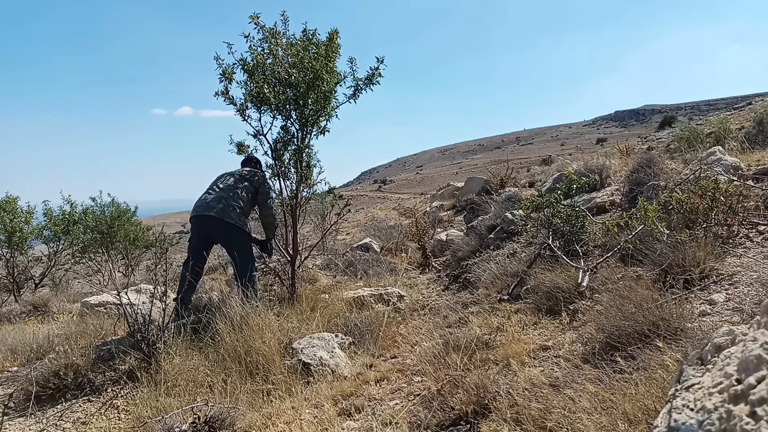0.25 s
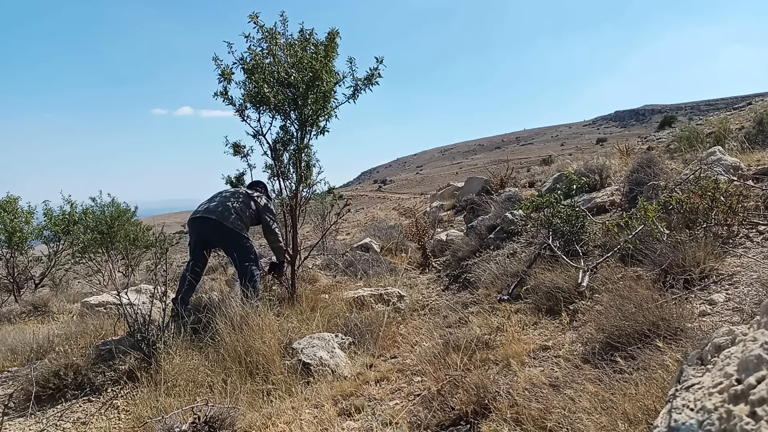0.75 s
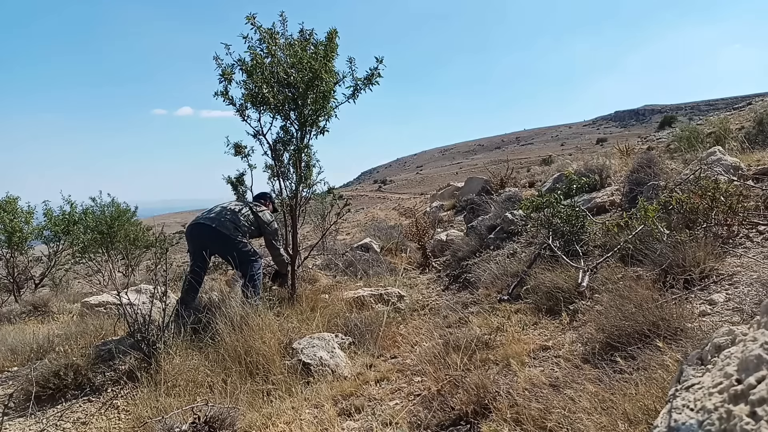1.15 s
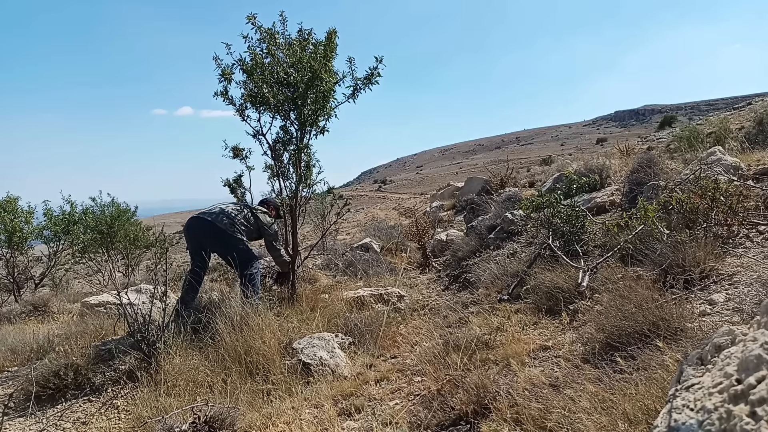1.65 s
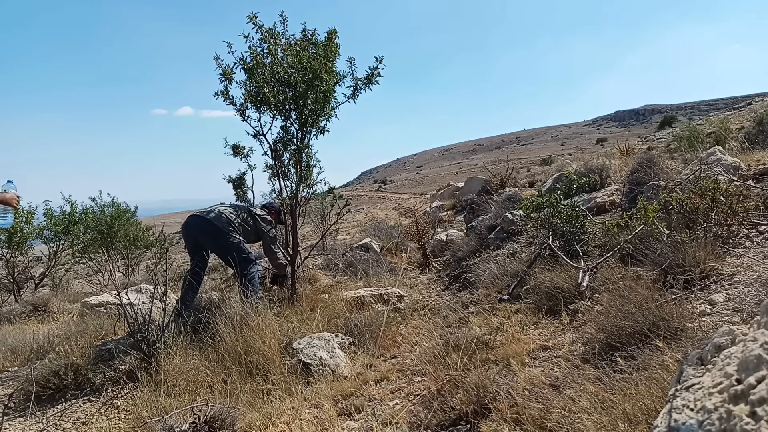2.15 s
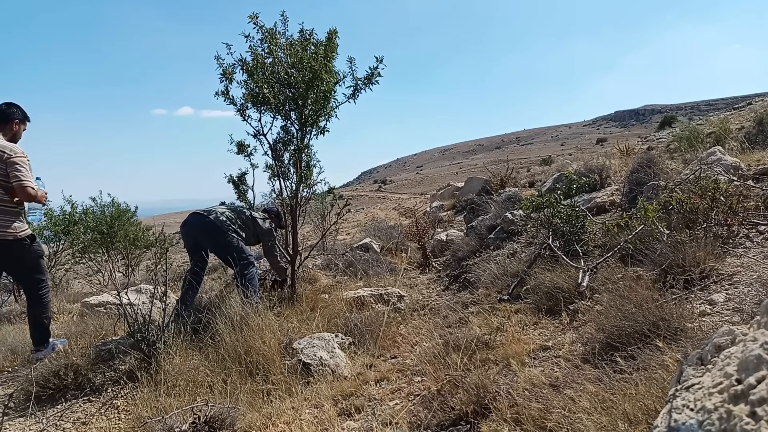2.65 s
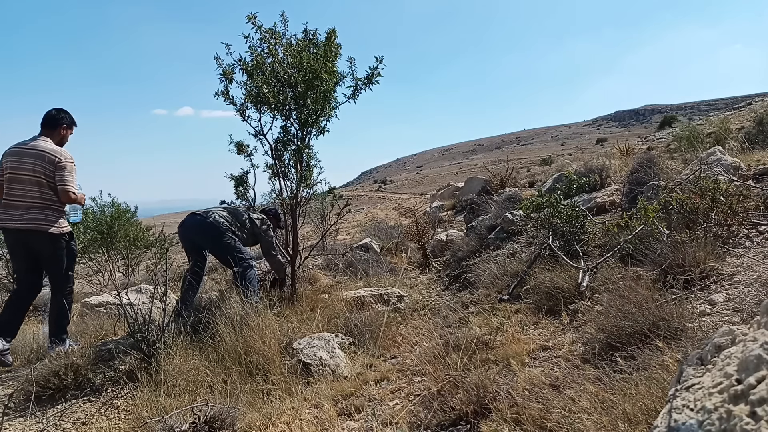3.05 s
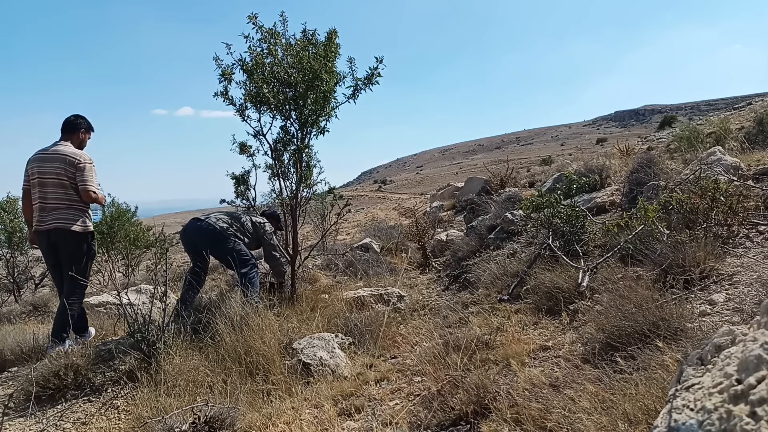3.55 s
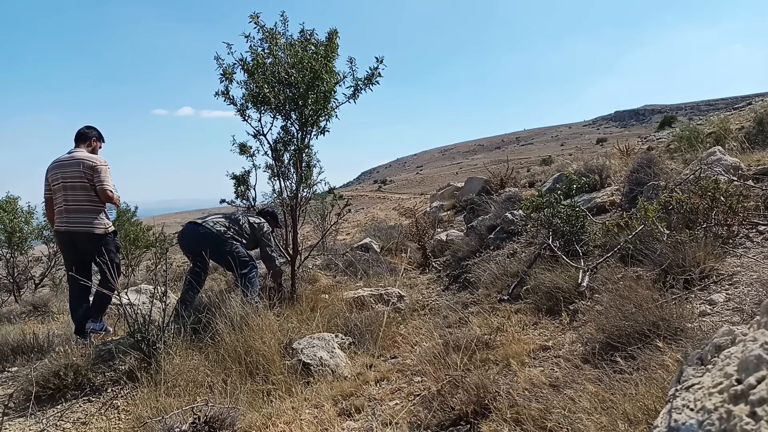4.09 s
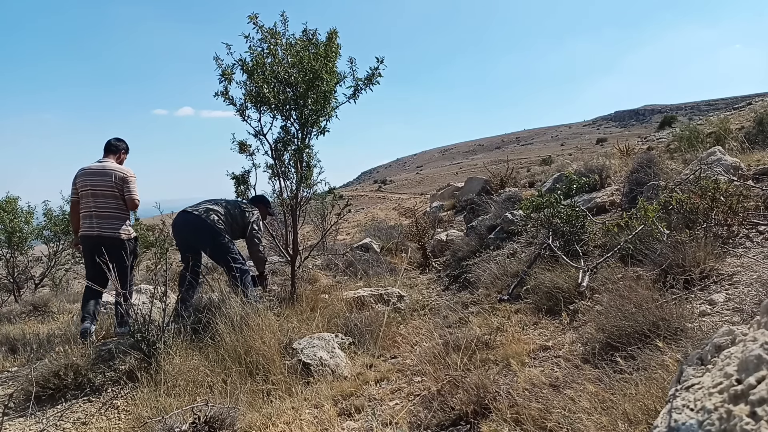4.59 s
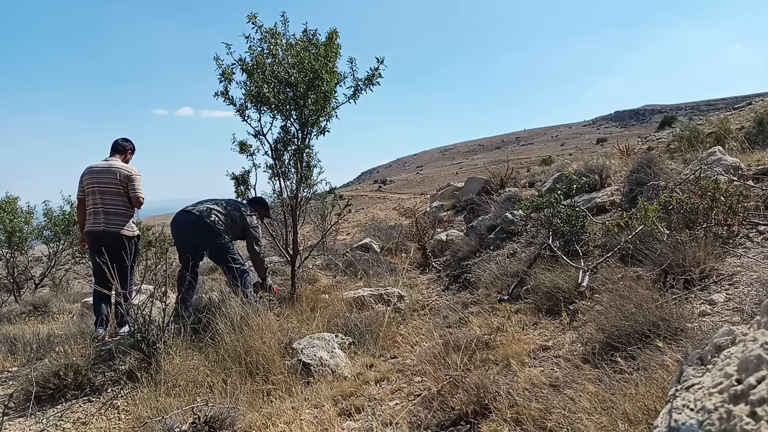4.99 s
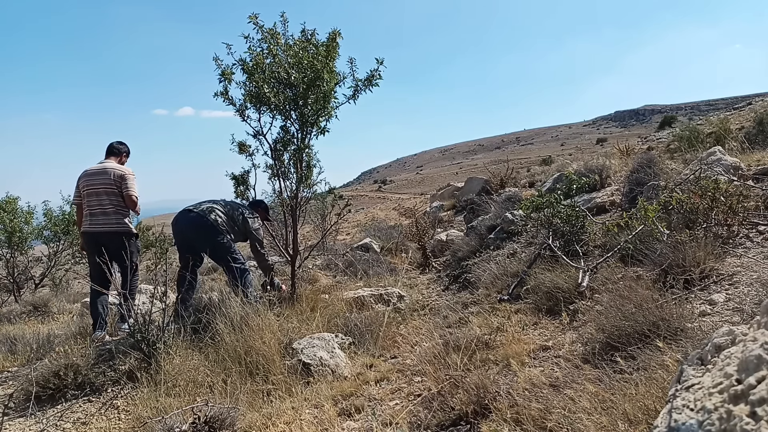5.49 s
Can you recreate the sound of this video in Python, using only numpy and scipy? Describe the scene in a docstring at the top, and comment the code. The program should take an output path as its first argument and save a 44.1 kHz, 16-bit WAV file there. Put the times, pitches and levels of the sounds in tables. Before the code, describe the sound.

On an open hillside, stems are snipped and torn with short squeaking scrapes among crackling dry leaves and rumbling wind buffets.

```python
"""Dry hillside, outdoors: brush is cut back near the microphone, over a faint hush of open air.
A hard puff bumps the microphone, dry branches rustle and twigs snap; at 1.8 s a blade begins to scrape and squeak.
After 3 s there is a lull of light rustling, then from 3.7 s stronger gusts, with two more strokes near 4 s.
The loudest stroke comes at 5.4 s and a faint touch of the blade at 5.7 s. Shaped noise makes the air, gusts, leaves,
tearing and snaps; decaying sines make the puffs, and narrow gliding noise bands make the squeaks."""
import sys
import numpy as np
from scipy import signal
from scipy.fft import rfft, irfft, next_fast_len
from scipy.io import wavfile
from scipy.ndimage import uniform_filter1d, map_coordinates

SR = 44100
rng = np.random.default_rng(int(sys.argv[2]) if len(sys.argv) > 2 else 0)


def generate_wav(signal):
    """Clip the signal to [-1, 1] and save it as 16-bit WAV at the path in sys.argv[1]."""
    frames = np.transpose(np.atleast_2d(signal))
    scaled = np.clip(frames, -1, 1) * 32767
    pcm = np.round(scaled).astype(np.int16)
    wavfile.write(sys.argv[1], SR, pcm)


N = 252693
TIME = np.arange(N) / SR

# open air, spectrum: (frequency [Hz], relative level [dB])
AIR_SPECTRUM = [(15, -42), (25, -8.5), (59, -6.5), (89, -10), (212, -12.5), (463, -19), (3430, -31),
                (4250, -29.5), (6050, -42.5), (9570, -42.5), (16000, -49)]
AIR_DB, AIR_WAVER_DB = -62.5, 1  # typical level, slow waver

# wind rumble at the microphone, spectrum: (frequency [Hz], relative level [dB])
RUMBLE_SPECTRUM = [(13, -55), (22, -13.5), (70, 7), (96, 4), (153, -8.5), (180, -14), (265, -22),
                   (302, -31), (335, -36), (453, -48.5), (700, -67.5), (910, -81), (1540, -120)]
# light air between gusts: (time [s], rumble level before BREEZE_TRIM_DB [dB])
BREEZE = [(0.0, -32), (0.8, -53), (1.21, -52), (1.71, -46.5), (3.05, -57.5), (3.4, -54.5), (3.94, -42),
          (4.2, -61), (4.61, -33), (4.98, -60), (5.22, -39), (5.73, -64.5)]
BREEZE_TRIM_DB = -2.5
# gusts on the microphone: (time [s], length [s], rumble level [dB],
# flutter level against the rumble, before its trim [dB])
GUSTS = [(0.0, 0.045, -23.5, -22), (0.052, 0.26, -35, -32), (0.438, 0.02, -29.5, -38),
         (0.522, 0.037, -38, -34), (0.894, 0.033, -28.5, -14), (0.95, 0.06, -36, -22),
         (1.067, 0.048, -42, -12.5), (1.323, 0.069, -31.5, -30), (1.459, 0.18, -33, -22),
         (1.733, 0.12, -35, -31), (1.884, 0.03, -27, -11), (1.947, 0.06, -31, -43), (2.03, 0.057, -42, -24),
         (2.193, 0.075, -27, -28.5), (2.287, 0.09, -45.5, -25), (2.497, 0.049, -37.5, -30),
         (2.589, 0.026, -27, -29), (2.784, 0.066, -46, 1.5), (2.863, 0.03, -31, -20),
         (3.071, 0.021, -46.5, -23), (3.368, 0.13, -41.5, -26), (3.602, 0.014, -36, -18),
         (3.743, 0.069, -24.5, -20.5), (3.819, 0.077, -21, -13), (3.903, 0.084, -31.5, -20.5),
         (4.026, 0.046, -26.5, -21), (4.145, 0.015, -35, -41), (4.238, 0.027, -35, -35),
         (4.389, 0.13, -19, -16), (4.503, 0.083, -21, -7), (4.605, 0.059, -25, -16.5),
         (4.704, 0.06, -31.5, -23), (4.788, 0.023, -24, -32), (4.884, 0.054, -36, -26),
         (5.075, 0.04, -31, -13), (5.136, 0.132, -34.5, -35), (5.335, 0.03, -31, -32.5),
         (5.39, 0.035, -41, -30), (5.515, 0.079, -44, -27)]
GUST_RISE_DB_PER_S, GUST_FALL_DB_PER_S = 756, 623
# single hard puffs: (time [s], relative level [dB], nominal pitch [Hz])
PUFFS = [(0.036, -10, 123), (0.422, -25, 95), (0.875, -24.5, 200), (0.949, -21, 119), (1.487, -23.5, 112),
         (1.593, -16, 114), (2.232, -22, 112), (2.584, -18, 115), (2.607, -20, 102), (3.716, -18.5, 128),
         (4.518, -13, 111.7), (4.567, -11, 185), (4.634, -16, 140), (4.792, -18, 106), (5.127, -19, 113),
         (5.284, -20, 100)]

# soft scuffs in the dry grass: (time [s], length [s], level [dB])
SCUFFS = [(1.051, 0.078, -56.5), (1.162, 0.072, -52), (2.762, 0.16, -55.5), (3.607, 0.15, -70),
          (4.095, 0.127, -54)]

# dry leaves, spectrum: (frequency [Hz], relative level [dB])
LEAVES_SPECTRUM = [(240, -51), (400, -18), (687, -12), (979, -14), (1130, -17), (1820, -10), (2290, -15.5),
                   (3210, -6), (4110, -7.5), (6340, 0.5), (7990, -2), (11400, -11.5), (16000, -20)]
# ringing of dry twigs: (frequency [Hz], width [Hz], relative level [dB])
TWIG_MODES = [(2880, 69, -13), (5300, 160, -6), (6450, 100, -14.5), (7900, 67, -14), (8200, 96, -18),
              (9100, 700, -5.5)]
# pushes on dry branches and grass: (time [s], length [s], level [dB], swell over the push [dB],
# settling rate [dB/s])
PUSHES = [(0.049, .07, -57.5, -5, 200), (0.141, 0.086, -29.5, 8, 153), (0.41, 0.061, -56.5, -8.5, 80),
          (0.852, 0.025, -45, -7, 107), (1.041, 0.12, -46.5, -1.5, 235), (1.258, 0.16, -64.5, -7, 54),
          (2.324, 0.08, -50.5, 8, 400), (2.71, 0.16, -55, -5, 200), (3.1, .2, -67, -1, 60),
          (3.445, 0.427, -56.5, 8.5, 300), (4.17, .13, -50, -14, 200), (4.429, 0.11, -43.5, 3, 157),
          (4.845, .19, -60, -5.5, 100), (5.045, 0.13, -47, -1, 150)]
PUSH_RISE_DB_PER_S = 603
STIR_DB = -71  # the leaves never quite come to rest

# breaking stems, spectrum: (frequency [Hz], relative level [dB])
TWIG_SPECTRUM = [(410, -87), (700, -38), (1150, -19), (1560, -9.5), (2880, -9), (3410, -9), (3940, -7.5),
                 (4550, -7), (5190, -4), (5610, -3.5), (7010, -3.5), (7590, -4), (9480, -3), (16000, -27.5)]
# snips and breaking twigs: (time [s], relative level [dB], pitch [Hz], relative woody knock [dB],
# relative bright edge [dB])
SNAPS = [(0.0431, -29.5, 6950, -32, -38), (0.0895, -30, 6900, -36, -32), (0.162, -13, 8210, -8, -3),
         (0.179, -15.5, 7640, -12, 3), (0.2205, -14, 6150, -38, -12.5), (0.2745, -17, 9100, -34, -33),
         (0.3603, -26, 6500, -39, -16), (0.398, -36, 6640, -41, -19), (0.7014, -35, 6200, -34, -16),
         (0.8062, -33.5, 9200, -31, -9), (0.9306, -29, 6900, -38, -12), (1.0326, -10.5, 6700, -11.5, -6),
         (1.383, -40, 5970, -32, -18), (1.6223, -41, 1130, 1, -32), (1.6819, -24.5, 3530, -7.5, -32),
         (1.824, -20.5, 2550, -12, -37), (1.8546, -23.5, 6700, -9, -34), (1.9345, -16, 4440, -1, -12),
         (1.9438, -18.5, 6160, -32, -9), (2.335, -16.5, 7400, -37, -9), (2.373, -17.5, 10400, -32, -20),
         (2.4783, -20.5, 9300, -35, -11), (2.5312, -19.5, 7600, -17, -21), (2.6399, -11.5, 7140, -11, -15),
         (2.6639, -11, 7250, -16, -10), (2.8494, -17, 6300, -35, -18), (2.979, -24.5, 6840, -31, -37),
         (3.123, -38.5, 2330, 3, -35), (3.436, -38.5, 7000, -16, -31), (3.672, -35, 1490, 0, -32),
         (3.6897, -15, 4920, -35, -14), (3.7807, -32, 5200, -18, -20), (3.7934, -29.5, 9100, -15, -17),
         (3.843, -16, 5540, -38, -18), (3.8625, -28, 6050, -11, -18), (4.0898, -15.5, 3520, -16, -34),
         (4.126, -17.5, 5230, -17, -20), (4.1627, -16, 3440, -19, -14), (4.2357, -29, 6850, -33, -12),
         (4.4295, -16, 7600, -15.5, -16), (4.8436, -25, 6000, -27, -19), (4.948, -42, 5920, -25, -2),
         (5.0543, -26, 6640, -20, -32), (5.0819, -18, 8000, -26, -19), (5.0922, -23.5, 6640, -17, -26.5),
         (5.1472, -24, 9000, -38, -11), (5.164, -25.5, 9150, -17, -38), (5.227, -35, 3880, -9, -38),
         (5.402, -22, 7050, -9.5, -15), (5.6136, -43, 10710, -32, -8)]

# blade tearing through stems, spectrum: (frequency [Hz], relative level [dB])
SCRAPE_SPECTRUM = [(240, -60), (400, -20.5), (607, -23.5), (789, -18), (964, -19), (1350, -6.5),
                   (1790, -14.5), (2180, -4), (2550, -4.5), (3420, -1.5), (5110, -2.5), (6850, 3.5),
                   (10500, -13), (11200, -19), (16000, -35)]
# ringing of the steel blade: (frequency [Hz], relative level [dB])
BLADE_MODES = [(2998, -62), (3499, -68.5), (3898, -58), (4258, -63), (4705, -53), (5152, -63), (5469, -60),
               (7058, -63), (8091, -56), (9216, -63)]
# rough side tones of the squeak: (multiple of the pitch [ratio], width [Hz], relative level [dB])
SIDE_TONES = [(.63, 500, -7), (.82, 550, -13), (1.12, 450, -12), (1.54, 448, -10.5), (1.68, 542, -23.5),
              (1.96, 777, -9.5)]
# blade strokes: (time [s], length [s], time to the deepest bite [s], relative level there [dB],
# swell before it [dB], sag after it [dB], woody body [dB], hiss at full speed [dB],
# bright edge at full speed and depth [dB], run-up [s], squeak at full speed [Hz],
# clearest squeak after the start [s], main tone at its clearest [dB], upper tone at its flare [dB])
STROKES = [(1.768, .21, 0.15, -43.5, 13.5, 2, -13, 2.5, -9, .02, 4270, 0.14, -7, -11),
           (2.049, 0.16, 0.042, -47.5, 3.5, -1.5, -19.5, 3.5, -13.5, .03, 4260, 0.087, -1, -1.5),
           (2.481, 0.27, 0.18, -41.5, 13.5, 0.5, -13.5, 4, -6.5, .14, 5450, 0.2, -14, -8.5),
           (2.793, .19, 0.084, -45, 7, -0.5, -19.5, 3, -9.5, .03, 4300, 0.13, -5, -14),
           (3.999, 0.24, 0.1, -33.5, 13, 12, -16.5, -1.5, -12.5, .085, 5480, 0.014, 0, -12),
           (4.29, 0.19, 0.17, -42.5, 6, 4, -31, 3.5, -7, .05, 4300, 0.11, -1, -9),
           (5.355, .167, 0.14, -30.5, 22.5, 3.5, -26, -4.5, -10.5, .085, 5250, 0.17, -7, -1),
           (5.674, 0.038, 0.011, -49.5, 5, 5, -42, -19, -24, .01, 3580, 0.017, -10, -25)]
STROKE_RISE_DB_PER_S, STROKE_STOP_DB_PER_S = 1300, 1111
BLADE_RING_DB, BLADE_RING_DB_PER_S = -19.5, 230  # lingering ring: level against the stroke, decay
START_SPEED, END_SPEED = .42, 0.57  # shares of full speed
BRAKE_S, BRAKE_FROM_HZ = .055, 4800  # slowing time; only strokes squeaking above this are braked
HISS_DB_PER_SPEED, EDGE_DB_PER_SPEED = 12, 25  # brightening per unit share of full speed
EDGE_OPENS_DB = 15  # a deeper bite is brighter
SQUEAK_S, SQUEAK_FADE_DB = 0.055, 15.5  # how long the squeak stays clear, how far it then sinks
# the upper squeak flares just after full speed: delay, duration, and how far it then sinks
UPPER_AFTER_S, UPPER_S, UPPER_FADE_DB = 0.0045, 0.055, 11.5
SIDE_TONES_DB = -1

TOP_HZ = 16100  # band limit of the recorder


def amp(db):
    """Decibels to gain."""
    return 10 ** (np.asarray(db) / 20)


def unit(x):
    """Scale to rms 1."""
    return x / np.sqrt(np.mean(x ** 2) + 1e-20)


def gain(points, hz):
    """Gain of (Hz, dB) points on a log frequency axis."""
    f, db = np.transpose(points)
    return amp(np.interp(np.log(hz + 1), np.log(f + 1), db))


def wobble(rate):
    """A smooth random curve, rate knots a second."""
    knots = rng.standard_normal(int(N * rate / SR) + 4)
    return map_coordinates(knots, [np.arange(N) * rate / SR])


def filtered(x, response):
    """x times a response of frequency."""
    m = next_fast_len(len(x) + 4096)
    return irfft(rfft(x, m) * response(np.fft.rfftfreq(m, 1 / SR)), m)[:len(x)]


def coloured(x, spectrum):
    """x with a spectrum, at rms 1."""
    return unit(filtered(x, lambda hz: gain(spectrum, hz)))


def add(track, s, x):
    """Mix x into the track at time s."""
    i = int(np.clip(round(s * SR), 0, N))
    track[i:i + len(x)] += x[:N - i]


def steady(x):
    """Even out the slow swells of x and keep its fine grain."""
    return x / np.sqrt(np.abs(uniform_filter1d(x ** 2, size=1300)) + 1e-9)


def plateau(s, length, rise_db_per_s, fall_db_per_s):
    """Envelope that rises to 1 at s, holds for length and dies away."""
    before = np.minimum(TIME - s, 0)
    after = np.maximum(TIME - s - length, 0)
    return amp(rise_db_per_s * before - fall_db_per_s * after)


def crackle(rate, spread_db, decay_s, hiss, count=16000):
    """Tiny fibre breaks of uneven size, each a short burst, over smooth friction hiss."""
    wait, size = rng.exponential(size=(2, count))
    start = (np.cumsum(wait) / rate * SR).astype(int)
    breaks = np.bincount(start, amp(spread_db * np.minimum(size, 4)) ** 2, N)[:N]
    energy = signal.lfilter([1], [1, -amp(-120 / (decay_s * SR))], breaks)  # falls 60 dB in decay_s
    return unit(np.sqrt(energy / energy.mean() + hiss ** 2) * rng.standard_normal(N))


def patchy(x, depth_db, size=256):
    """Each leaf and fibre has its own pitch: short, narrow patches of random gain."""
    z = signal.stft(x, nperseg=size)[2]
    field = uniform_filter1d(rng.standard_normal(z.shape), size=3, axis=0)
    field = uniform_filter1d(field, size=5, axis=1)
    patches = amp(depth_db * np.clip(unit(field), -2, 2))
    return unit(signal.istft(z * patches, nperseg=size)[1][:N])


def air():
    """The nearly steady hush of the open hillside, as shaped noise."""
    return amp(AIR_DB + AIR_WAVER_DB * wobble(2.91)) * coloured(rng.standard_normal(N), AIR_SPECTRUM)


def hillside(x, ground=0.17, wet_db=-21, t60=0.15):
    """The ground returns a close copy that ripples the spectrum; rocks and bushes scatter a short tail."""
    lag = .000854  # seconds
    echo = lambda hz: 1 + ground * np.exp(-2j * np.pi * hz * lag)
    x = filtered(x, echo) / np.hypot(1, ground)
    t = np.arange(SR // 2) / SR
    tail = filtered(rng.standard_normal(len(t)), lambda hz: 1 / (1 + (hz / 7000) ** 2))
    tail = tail * amp(-60 * t / t60) * (t > .004)
    return x + amp(wet_db) * signal.fftconvolve(x, tail / np.linalg.norm(tail))[:N]


def wind(dip=0.18, lumpy_db=3.0, flutter_trim_db=-2):
    """Eddies buffet the microphone with a deep rumble and a quicker flutter; a hard puff sweeps them aside."""
    deep = amp(np.interp(TIME, *np.transpose(BREEZE)) + BREEZE_TRIM_DB)
    quick = np.zeros(N)
    for s, length, db, flutter_db in GUSTS:
        gust = amp(db) * plateau(s, length, GUST_RISE_DB_PER_S, GUST_FALL_DB_PER_S)
        deep = np.maximum(deep, gust)
        quick = np.maximum(quick, gust * amp(flutter_db + flutter_trim_db))
    eddies = coloured(rng.standard_normal(N), RUMBLE_SPECTRUM)
    rumble = filtered(eddies, lambda hz: 1 / (1 + (hz / 200) ** 10))
    flutter = eddies - rumble
    swept = np.max([np.exp(-((TIME - s - .01) / 0.049) ** 2) for s, _, _ in PUFFS], axis=0)
    lumps = unit(amp(lumpy_db * np.clip(wobble(32), -2, 1.2)))
    return lumps * (1 - dip * swept) * (deep * steady(rumble) + quick * steady(flutter))


def bumps(sharpness=2.5):
    """A hard puff swings the diaphragm back and forth once or twice; the harder it is, the sharper it knocks."""
    out = np.zeros(N)
    t = np.arange(SR // 16) / SR - .009
    onset = np.clip((t - t[0]) / 0.0054, 0, 1)
    for s, db, hz in PUFFS:
        swing = np.sin(2 * np.pi * hz * 1.007 * t) * np.exp(-np.abs(t) * hz * 3.0) * onset
        reach_hz = sharpness * hz * amp(.5 * (db + 18.5))
        knock = filtered(swing, lambda f: 1 / (1 + (f / reach_hz) ** 6))
        add(out, s, -amp(db + 5.5) * knock)
    return out


def scuffs():
    """Dull, short shuffles on the ground, as swells of low noise."""
    out = np.zeros(N)
    earth = coloured(rng.standard_normal(N), [(80, -44), (250, 3), (600, 2), (1200, -7.0), (3000, -14)])
    for s, length, db in SCUFFS:
        out += amp(db) * np.sin(np.pi * np.clip((TIME - s) / length, 0, 1)) * earth
    return out


def twig_ring(hz, ring=1.6):
    """Dry twigs add their resonances to the rustle."""
    return 1 + ring * sum(amp(db) / (1 + 2j * (hz - centre) / width) for centre, width, db in TWIG_MODES)


def rustle(ticks_db=-5):
    """Each push makes dry leaves crackle in clumps, tick and set the twigs ringing; then the branch settles."""
    level = np.full(N, amp(STIR_DB))
    for s, length, db, swell_db, settle_db_per_s in PUSHES:
        swell = amp(db + swell_db * np.clip((TIME - s) / length - 1, -1, 0))
        push = swell * plateau(s, length, PUSH_RISE_DB_PER_S, settle_db_per_s)
        level = np.maximum(level, push)
    grains = crackle(rate=700, spread_db=4, decay_s=0.021, hiss=0.43) * amp(1.9 * wobble(60))
    ticks = crackle(rate=55, spread_db=4.5, decay_s=0.017, hiss=0)
    leaves = patchy(grains + amp(ticks_db) * ticks, depth_db=4.8)
    return level * coloured(filtered(leaves, twig_ring), LEAVES_SPECTRUM)


def snaps(crack_s=0.033, tail_s=0.12, tail_db=-23, lead_in_db=-19, ring_db=7, ring_width_hz=400):
    """A faint rush of noise swells for 12 ms into a sharp crack, which rings briefly at its pitch and shivers out."""
    out, lead = np.zeros(N), .012  # seconds of soft lead-in before the crack
    t = np.arange(SR // 8) / SR - lead
    lead_in = amp(lead_in_db - 60 * np.abs(t) / 0.025)
    release = amp(-60 * t / crack_s) + amp(tail_db - 60 * t / tail_s)
    fade = np.where(t < 0, lead_in, release)
    grain_hz = np.arange(0, SR / 2, 350)
    for s, db, pitch, knock_db, edge_db in SNAPS:
        knock = np.clip(knock_db + 12.5, -12, 12)
        edge = np.clip(edge_db + 17.0, -12, 12)
        tilt = [(1800, knock), (4000, 0), (8500, 0), (12000, edge)]
        # every stem has its own uneven set of resonances
        grain = np.c_[grain_hz, 3 * rng.standard_normal(len(grain_hz))]

        def stem(hz):
            """Colour of this stem, with a peak at its pitch."""
            peak = 1 + amp(ring_db) / (1 + ((hz - pitch) / ring_width_hz) ** 2)
            return gain(TWIG_SPECTRUM, hz) * gain(tilt, hz) * peak * gain(grain, hz)

        crack = filtered(rng.standard_normal(len(t)) * fade, stem)
        add(out, s - lead, amp(db - 25) * unit(crack))
    return out


def blade_speed(t, length, run_up, top_hz):
    """Share of full speed: the blade gathers pace, and the fast strokes are braked before they end."""
    gather = START_SPEED + (1 - START_SPEED) * np.sin(np.pi / 2 * np.clip(t / run_up, 0, 1))
    brake = (1 - END_SPEED) * np.clip((t - length) / BRAKE_S + 1, 0, 1) ** 2
    return gather * (1 - brake * (top_hz > BRAKE_FROM_HZ))


def blade_ring(hz, ring=1.03, width_hz=45):
    """The narrow resonances of the blade colour whatever it tears."""
    centres, db = np.transpose(BLADE_MODES)
    gains = amp(db - db.max())
    return 1 + ring * sum(g / (1 + 2j * (hz - centre) / width_hz) for centre, g in zip(centres, gains))


def squeak(hz, tone_db, upper_db, upper_ratio=1.54, stray=.035, flicker_db=4.5, width_hz=190):
    """Friction tones and side tones glide with the blade's speed and flicker as its grip changes."""

    def line(pitch, width):
        """Narrow noise of rms 1 around a moving pitch."""
        turn = 2 * np.pi * np.cumsum(pitch) / SR
        return unit(wobble(width) * np.cos(turn) + wobble(width) * np.sin(turn))

    def tone(pitch):
        """A clear, slightly unsteady line."""
        wavering = pitch * (1 + 0.0051 * wobble(50))
        return unit(steady(line(wavering, width_hz)) * amp(2.3 * wobble(60)))

    sides = np.zeros(N)
    for ratio, width, db in SIDE_TONES:
        flicker = amp(db + flicker_db * wobble(40))
        sides += flicker * line(ratio * hz * (1 + stray * wobble(35)), width)
    # the side tones fade with the main one, half as fast
    sides_db = SIDE_TONES_DB + .5 * np.minimum(tone_db, 0)
    return amp(tone_db) * tone(hz) + amp(upper_db) * tone(upper_ratio * hz) + amp(sides_db) * sides


def strokes(lead_s=.025):
    """The blade tears fibres and squeaks, louder as it bites deeper and brighter as it runs faster, then rings out."""
    rows = np.array(STROKES)
    # each stroke's settings take over lead_s before it starts
    current = np.maximum(np.searchsorted(rows[:, 0] - lead_s, TIME) - 1, 0)
    (s, length, bite, db, swell_db, sag_db, body_db, hiss_db, edge_db,
     run_up, top_hz, clear_s, tone_db, upper_db) = rows[current].T
    t = TIME - s
    speed = blade_speed(t, length, run_up, top_hz)
    shallow = np.clip(1 - t / bite, 0, 1)
    spent = np.clip((t - bite) / np.maximum(length - bite, .005), 0, 1)
    cut = plateau(s, length, STROKE_RISE_DB_PER_S, STROKE_STOP_DB_PER_S)
    ring = amp(BLADE_RING_DB) * plateau(s, length, STROKE_RISE_DB_PER_S, BLADE_RING_DB_PER_S)
    gate = np.maximum(cut, ring)

    fade_db = SQUEAK_FADE_DB * (np.exp(-((t - clear_s) / SQUEAK_S) ** 2) - 1)
    flare_db = UPPER_FADE_DB * (np.exp(-((t - run_up - UPPER_AFTER_S) / UPPER_S) ** 2) - 1)
    tearing = patchy(crackle(rate=1000, spread_db=3.5, decay_s=0.0039, hiss=0.99), depth_db=4.5)
    drive = tearing + squeak(top_hz * speed, tone_db + fade_db, upper_db + flare_db)
    rasp = coloured(filtered(drive, blade_ring), SCRAPE_SPECTRUM)

    # split into four bands, each levelled before it follows the stroke
    below = [filtered(rasp, lambda hz: 1 / (1 + (hz / edge_hz) ** 20)) for edge_hz in (1850, 5300, 9200)]
    bands = np.diff([np.zeros(N), *below, rasp], axis=0)
    body, core, hiss, edge = (steady(band) for band in bands)
    body = body * amp(body_db)
    hiss = hiss * amp(hiss_db + HISS_DB_PER_SPEED * (speed - 1))
    edge = edge * amp(edge_db + EDGE_DB_PER_SPEED * (speed - 1) - EDGE_OPENS_DB * shallow)
    level = amp(db - swell_db * shallow - sag_db * spent)
    return gate * level * (core + body + hiss + edge)


def scene():
    """The work in the brush, with wind and air at the microphone."""
    work = scuffs() + rustle() + snaps() + strokes()
    return (air() + wind() + bumps() + hillside(work))[None]


def record(dry, low_cut_hz=50):
    """The recorder thins the deepest rumble and keeps nothing above its band limit."""
    band = lambda hz: (hz < TOP_HZ) * hz ** 2 / np.hypot(hz ** 2, low_cut_hz ** 2)
    return np.array([filtered(channel, band) for channel in dry])


dry = scene()
out = record(dry)
generate_wav(out)
```